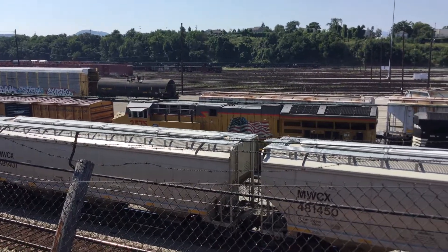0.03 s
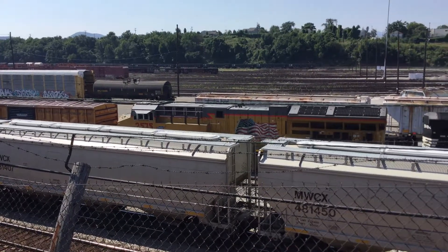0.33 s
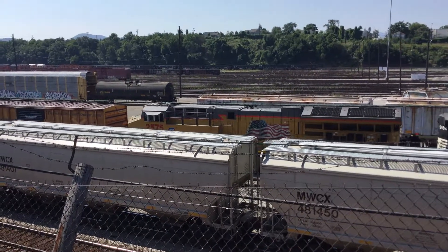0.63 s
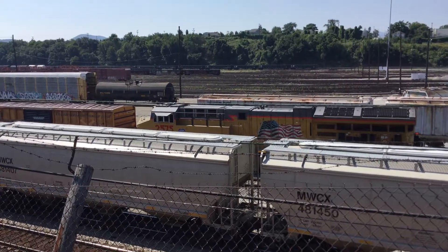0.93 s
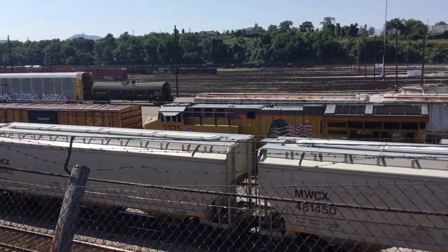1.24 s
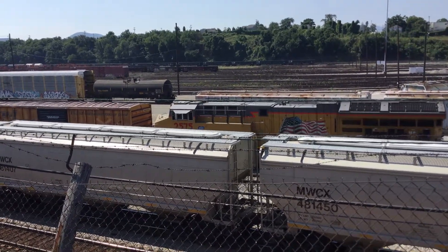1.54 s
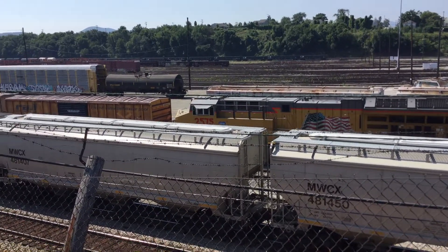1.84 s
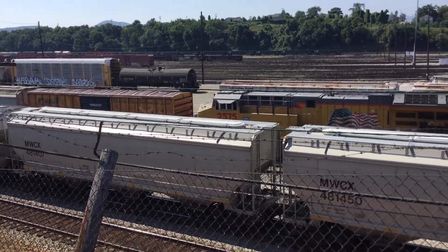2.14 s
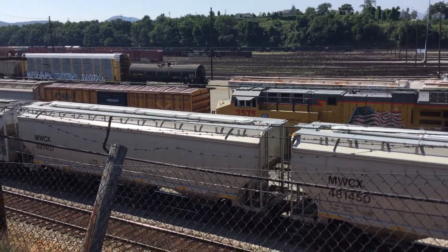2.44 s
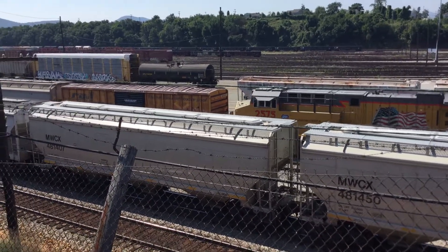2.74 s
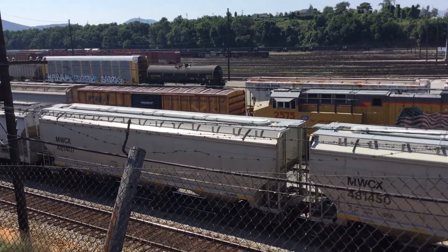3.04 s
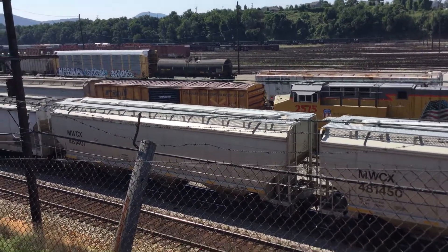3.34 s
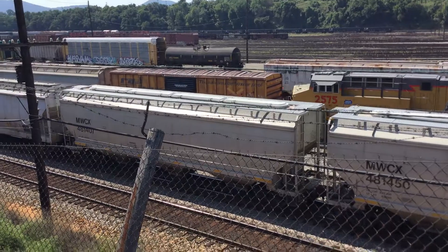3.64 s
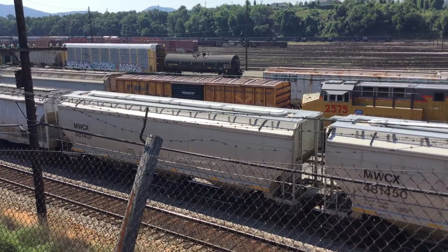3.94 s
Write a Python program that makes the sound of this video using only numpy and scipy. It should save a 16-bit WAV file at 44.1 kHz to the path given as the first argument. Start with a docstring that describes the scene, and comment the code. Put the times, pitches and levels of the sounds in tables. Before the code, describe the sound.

A diesel locomotive idles with an uneven throb over rail yard rumble, heard from a bank above. Creeping freight cars give faint squeals, ticks and hollow booms. Midway, tyre noise swells and fades, probably a passing vehicle.

```python
"""A rail yard heard from the bank above it. From the start a sixteen-cylinder diesel locomotive idles over
the rumble of the yard, its unequal firing pulses ringing the exhaust in an uneven throb. Creeping freight
cars give thin wheel squeals, then ticks, scrapes and hollow booms. Midway a rush of tyre noise swells,
drops in pitch and fades, probably a vehicle passing close by. More booms and ticks follow, and two faint
squeals come near the end."""
import sys
import numpy as np
from scipy import signal
from scipy.io import wavfile

SR = 44100
rng = np.random.default_rng(int(sys.argv[2]) if len(sys.argv) > 2 else 0)


def store_wav(level_fs):
    """Save 16-bit WAV to argv[1]."""
    pcm = np.round(np.clip(np.atleast_2d(level_fs), -1, 1) * 32767)
    wavfile.write(sys.argv[1], SR, pcm.T.astype(np.int16))


N = 176400


def from_db(db):
    """Amplitude grows tenfold every 20 dB."""
    return 10 ** (np.asarray(db) / 20)


def rms_one(x):
    """Division by the rms gives unit power."""
    return x / np.sqrt(np.mean(x ** 2) + 1e-20)


def envelope(rows):
    """Gain over time, linear in decibels between (seconds, dB) points."""
    return from_db(np.interp(np.arange(N) / SR, *np.transpose(rows)))


def drift(corner_hz):
    """Low-passed noise wanders at random, with rms near 1."""
    step = 40   # samples per random value
    pole = np.exp(-2 * np.pi * corner_hz * step / SR)
    white = rng.standard_normal(N // step + 2002)
    slow = signal.lfilter([1], [1, -2 * pole, pole * pole], white)[2000:]
    return np.interp(np.arange(N) / step, np.arange(len(slow)), rms_one(slow))


def resonate(x, hz, width_hz):
    """Two equal damped resonators in series, with unit gain at resonance."""
    r = np.exp(-np.pi * width_hz / SR)
    gain = (1 - r * r) / 2
    section = [gain, 0, -gain, 1, -2 * r * np.cos(2 * np.pi * hz / SR), r * r]
    return signal.sosfilt([section, section], x)


def narrow_noise(hz, width_hz):
    """A resonance selects one band from white noise; unit power."""
    return rms_one(resonate(rng.standard_normal(N + SR // 2), hz, width_hz)[-N:])


def banded_noise(spectrum, flicker_db):
    """Third-octave noise bands, each flickering on its own, add up to unit power."""
    edges = 22 * 2 ** (np.arange(30) / 3)
    white = rng.standard_normal((2, N + SR // 2))
    hz, db = np.transpose(spectrum)
    out = np.zeros(N)
    for k, (low, high) in enumerate(zip(edges, edges[1:])):
        bandpass = signal.butter(2, [low, high], "band", fs=SR, output="sos")
        band = signal.sosfilt(bandpass, white[k % 2])[-N:]
        band_db = np.interp(np.log(low * high) / 2, np.log(hz), db)
        out += band * from_db(band_db + flicker_db * drift(21))
    return rms_one(out)


def gliding_noise(rows, top_width_hz):
    """Reading band noise more slowly lowers its pitch and bandwidth together."""
    times, hz, db = np.transpose(rows)
    position = np.cumsum(np.interp(np.arange(N) / SR, times, hz / hz.max()))
    band = narrow_noise(hz.max(), top_width_hz)
    return envelope(np.c_[times, db]) * np.interp(position, np.arange(N), band)


def bursts(rows, relative_width):
    """Steel on steel: resonant noise swells and fades under Gaussian envelopes."""
    t = np.arange(N) / SR
    out = np.zeros(N)
    for peak, sigma, db, hz in rows:
        swell = np.exp(-((t - peak) / sigma) ** 2 / 2)
        out += from_db(db) * swell * narrow_noise(hz, relative_width * hz)
    return out


# Cylinders in firing order. Each row: relative level in dB, lateness in milliseconds.
CYLINDERS = [(-6, -.3), (4.2, -1), (2, -.5), (.6, 1.6), (-17, -2.9), (1.4, 4.7), (-5.1, -3.2), (2.1, 1.3),
             (.6, .8), (-11.3, -.1), (-9, .9), (.9, -4.9), (.4, -3.4), (-.8, .3), (-6.7, 4.2), (-7.4, 5.8)]
# Exhaust resonances. Each row: frequency in Hz, width in Hz, gain in dB.
EXHAUST_MODES = [(78, 23.7, 0), (177.7, 34, -16.5), (290.5, 61.4, -22)]
# Blowers and ringing panels. Each row: frequency in Hz, width in Hz, relative level in dB.
WHINES = [(177.34, 6.5, -40), (629.6, 25, -58), (1029, 13, -50.5), (1951, 74, -55), (2060, 18, -67.5),
          (3803, 150, -62)]
# Loudness of the locomotive. Each row: time in seconds, gain in dB.
ENGINE_LEVEL = [(0, -2.5), (.9, 0.2), (2, -1.1), (2.6, -2.5), (3.2, -2), (4, -3.5)]


def locomotive(cycle_hz=4.821, first_firing_s=0.003, pulse_db=37, scatter_s=0.0001, scatter_db=0.5):
    """Impulse excitation: unequal cylinders ring the exhaust in turn, so it throbs; blowers whine above."""
    count = len(CYLINDERS)
    firing = np.arange(-2 * count, int((N / SR * cycle_hz + 1) * count))
    db, late_ms = np.array(CYLINDERS)[firing % count].T
    time_error, level_error = rng.standard_normal((len(firing), 2)).T
    times = first_firing_s + firing / count / cycle_hz + late_ms / 1000 + scatter_s * time_error
    strengths = from_db(pulse_db + db + scatter_db * level_error)
    samples = ((times + 1) * SR).astype(int)   # a second of lead-in: the exhaust is already ringing
    pulses = np.bincount(samples, strengths, N + 2 * SR) + 1e-18
    throb = sum(from_db(gain_db) * resonate(pulses, hz, width) for hz, width, gain_db in EXHAUST_MODES)
    whine = sum(from_db(gain_db) * narrow_noise(hz, width) for hz, width, gain_db in WHINES)
    return envelope(ENGINE_LEVEL) * (throb[SR:SR + N] + whine)


# Spectrum of the rumble. Each row: frequency in Hz, relative spectral density in dB.
YARD_SPECTRUM = [(25, -22), (40, -9), (65, -6.5), (95, -6), (135, -2), (185, -5.5), (230, -9.5),
                 (300, -7.5), (410, -22), (520, -23), (680, -18), (860, -20), (1100, -19), (1600, -24),
                 (2000, -28), (2500, -34), (3100, -34), (3800, -39.5), (4500, -39.5), (5800, -43),
                 (7500, -50.5), (11000, -54), (15000, -60)]
# Loudness of the rumble. Each row: time in seconds, level in dB.
YARD_LEVEL = [(0, -31), (.8, -31), (1.3, -31.5), (2, -29.5), (3, -32), (4, -33)]


def yard():
    """Incoherent addition: far machinery and rolling cars merge into a rumble over a second engine."""
    far_engine = from_db(-38.5) * narrow_noise(hz=66.5, width_hz=6)
    return envelope(YARD_LEVEL) * banded_noise(YARD_SPECTRUM, flicker_db=1.54) + far_engine


# Modes of three wheels. Each row: frequency in Hz, relative level in dB.
WHEEL_A = [(5630, -8), (8460, -9), (11050, -6), (11230, -10), (11450, -10), (14830, -11)]
WHEEL_B = [(4915, -7), (5005, 0), (5810, -3), (6200, -9), (6710, -8), (8510, -6.5), (10600, -12),
           (11810, -8), (12790, -11), (13490, -6), (14400, -15), (15100, -18)]
WHEEL_C = [(10470, 0.5), (10690, -9)]
# Flange rubs. Each row: start in seconds, length in seconds, level in dB, relative echo level in dB,
# relative friction noise level in dB, wheel.
SQUEALS = [(-.03, 0.034, -60.5, 1, 2, WHEEL_A), (0.603, 0.05, -59.5, -2, -5, WHEEL_B),
           (0.656, 0.033, -53.5, -5, -7, WHEEL_B), (1.08, 0.037, -64, 0, 1, WHEEL_A),
           (3.65, .011, -58, -8, -5, WHEEL_C), (3.708, 0.014, -56.5, -16, -16, WHEEL_C)]


def wheel_squeals(attack_s=0.005, ring_t60_s=0.14, waver_hz=105.4, echo_t60_s=2.1, loss_per_khz=0.072):
    """Stick-slip friction drives a wheel's modes as wavering tones that ring out and echo among cars."""
    out = np.zeros(N)
    for start, length, db, echo_db, rub_db, wheel in SQUEALS:
        t = np.maximum(np.arange(N) / SR - start, 0)
        since_release = np.maximum(t - length, 0)
        direct = np.minimum(t / attack_s, 1) * from_db(-60 * since_release / ring_t60_s)
        squeal = direct * from_db(rub_db) * narrow_noise(hz=9000, width_hz=9000)
        for hz, mode_db in wheel:
            pitch = hz + waver_hz * drift(corner_hz=124)
            tone = np.sqrt(2) * np.sin(2 * np.pi * np.cumsum(pitch) / SR)
            t60 = echo_t60_s * np.exp(-loss_per_khz * hz / 1000)   # high modes linger less
            echo = np.minimum(t / length, 1) * from_db(echo_db - 60 * since_release / t60)
            squeal += from_db(mode_db) * (direct * tone + echo * narrow_noise(hz, width_hz=39))
        out += from_db(db) * squeal
    return out


# Coupling ticks, with one broader flange rub at 0.68 s. Each row: peak time in seconds, Gaussian sigma in
# seconds, level in dB, centre in Hz.
TICKS = [(.535, .008, -55, 5200), (.682, 0.026, -57, 9000), (1.084, 0.008, -51.5, 6180),
         (2.62, .004, -55, 5000), (2.682, 0.006, -52, 4500), (3.351, 0.0016, -49, 10300),
         (3.64, 0.0066, -58, 7300)]


def coupling_ticks():
    """Brief, hard contact in the couplings spreads energy over a wide treble band; the longer burst at 0.68 s
    is a wheel flange rubbing."""
    return bursts(TICKS, relative_width=0.65)


# Dull scrapes. Each row: peak time in seconds, Gaussian sigma in seconds, level in dB, centre in Hz.
SCRAPES = [(.95, 0.045, -43, 1470), (.96, 0.033, -53, 1760), (1.12, 0.1, -43, 1250)]


def car_scrapes():
    """Sliding friction on the creeping cars excites a midrange resonance."""
    return bursts(SCRAPES, relative_width=0.2)


# Tread drone, and its higher song as it recedes. Each row: time in seconds, pitch in Hz, level in dB.
TREAD_DRONE = [(0, 460, -73), (1.05, 460.6, -49.5), (1.35, 469, -45.5), (1.55, 505, -36.5),
               (1.68, 510, -37.5), (1.79, 538, -37), (1.9, 450, -42), (2.1, 401, -43.5), (2.5, 375, -71)]
TREAD_SONG = [(1.6, 1283, -55), (1.95, 1215, -45), (2.25, 1106, -45), (2.6, 1094, -49), (3.1, 1077, -75)]
# Spectra of tyre roar and hiss. Each row: frequency in Hz, relative spectral density in dB.
ROAR_SPECTRUM = [(30, -5), (150, 7), (250, -3), (340, 6), (460, 0), (600, -5), (800, -1), (1100, -4.5),
                 (1600, -6), (2600, -13.5), (4000, -17), (6000, -26.5), (9000, -39), (15000, -49)]
HISS_SPECTRUM = [(30, -50), (2000, -22), (4500, -1.5), (8000, 2.5), (11000, -0.5), (15000, 0.5)]
# Their loudness in passing. Each row: time in seconds, level in dB.
ROAR_LEVEL = [(0, -53), (1.35, -58), (1.6, -40), (1.88, -34), (2.15, -40), (2.6, -42.5), (3.2, -46.5),
              (4, -50)]
HISS_LEVEL = [(0, -65), (1.38, -66), (1.55, -55.5), (1.76, -51.5), (2.1, -57.5), (2.6, -61.5), (3.3, -70),
              (4, -79)]


def passing_tyres():
    """A moving source: roar and hiss peak at closest approach; the tread's pitch drops as it goes by."""
    drone = gliding_noise(TREAD_DRONE, top_width_hz=146)
    song = gliding_noise(TREAD_SONG, top_width_hz=220)
    roar = envelope(ROAR_LEVEL) * banded_noise(ROAR_SPECTRUM, flicker_db=0.5)
    hiss = envelope(HISS_LEVEL) * banded_noise(HISS_SPECTRUM, flicker_db=2.7)
    return drone + song + roar + hiss


# Car body booms. Each row: peak time in seconds, Gaussian sigma in seconds, level in dB, centre in Hz.
BOOMS = [(1.15, 0.032, -34.5, 273), (1.34, 0.037, -29.5, 170), (1.4, 0.085, -40.5, 375.4),
         (2.05, 0.036, -34.5, 323), (2.31, 0.04, -36, 330), (2.48, 0.037, -34, 287),
         (2.872, 0.0076, -38, 310), (3.09, 0.041, -39, 296)]


def car_booms():
    """Low resonances of the hollow car bodies sound in short swells."""
    return bursts(BOOMS, relative_width=0.24)


def scene():
    """Superposition: the pressures of all sources add at one microphone."""
    cars = wheel_squeals() + coupling_ticks() + car_scrapes() + car_booms()
    return (locomotive() + yard() + passing_tyres() + cars)[None]


def record(dry, low_cut_hz=24.3, high_cut_hz=15300):
    """Band limiting: the microphone thins the deepest bass, and the top is cut steeply."""
    highpass = signal.butter(2, low_cut_hz, "high", fs=SR, output="sos")
    lowpass = signal.ellip(12, .2, 90, high_cut_hz, fs=SR, output="sos")
    return signal.sosfilt(lowpass, signal.sosfilt(highpass, dry))


dry = scene()
out = record(dry)
store_wav(out)
```